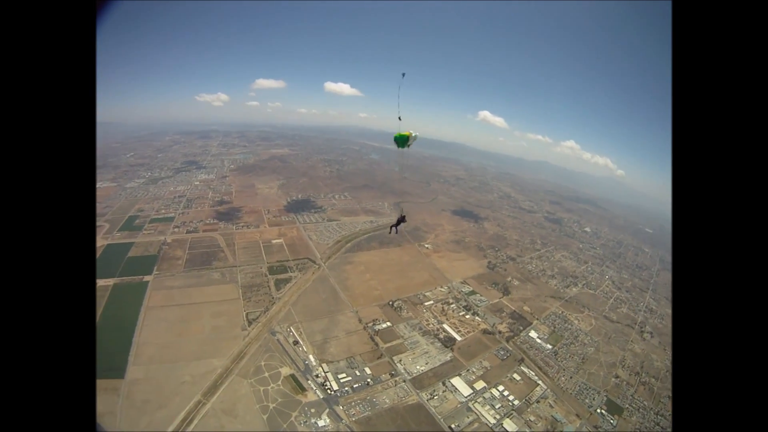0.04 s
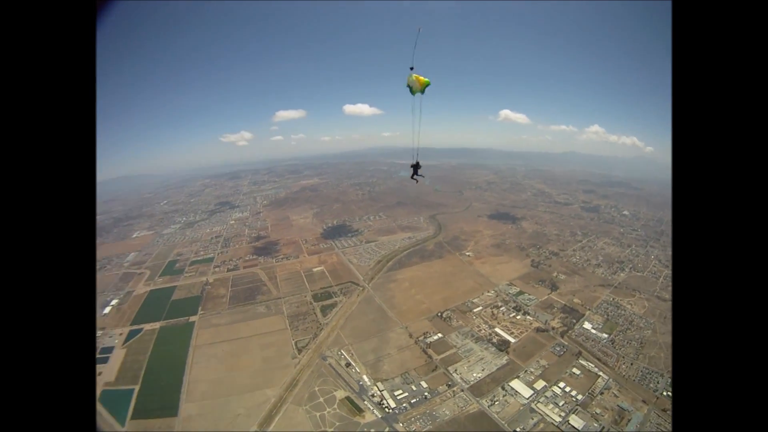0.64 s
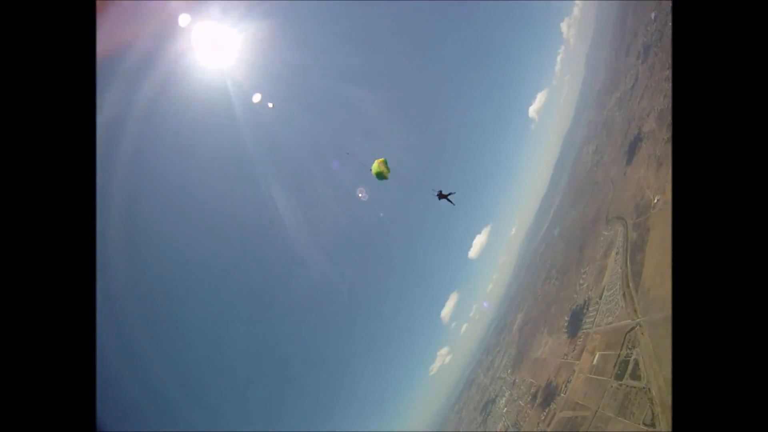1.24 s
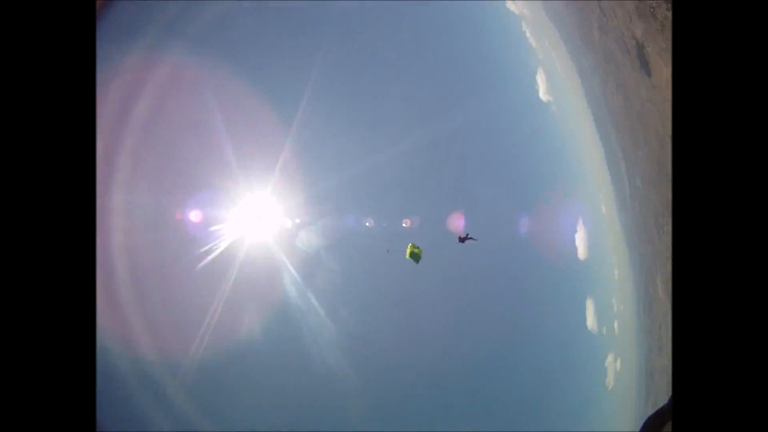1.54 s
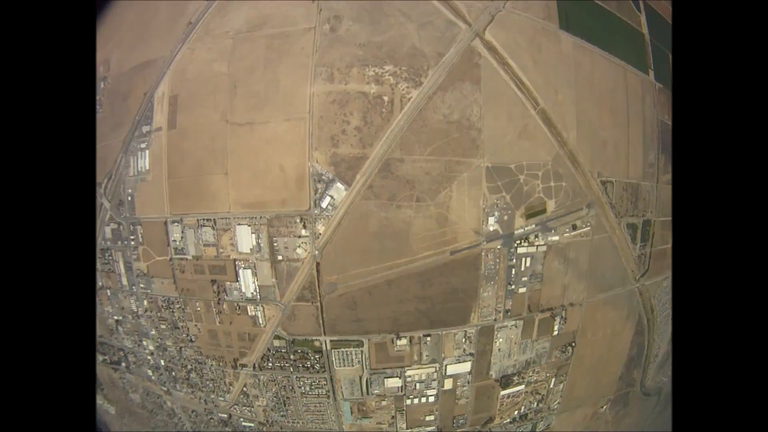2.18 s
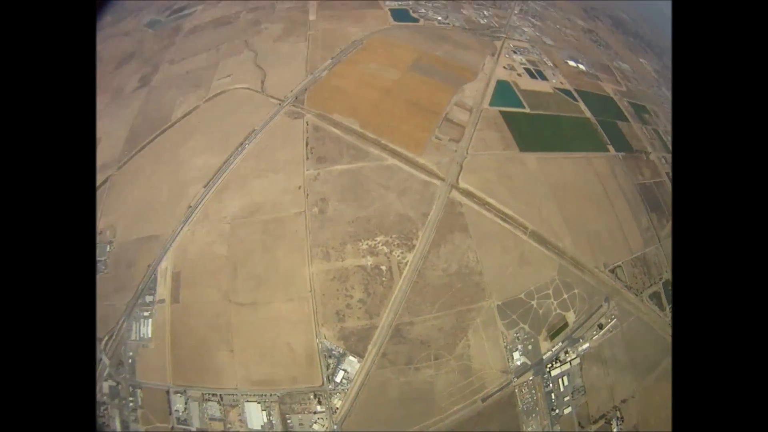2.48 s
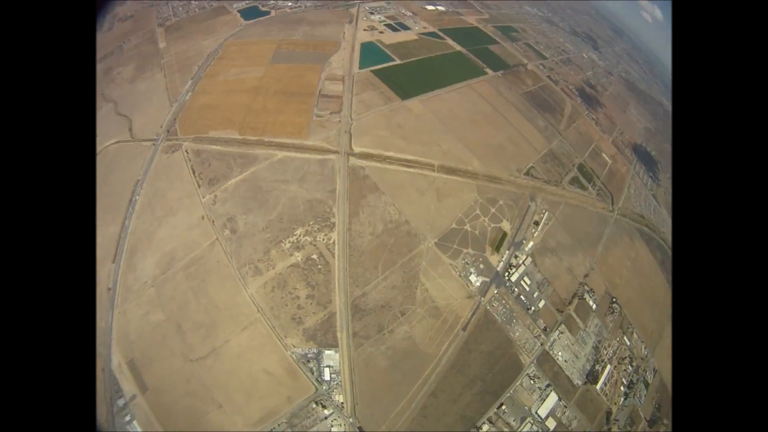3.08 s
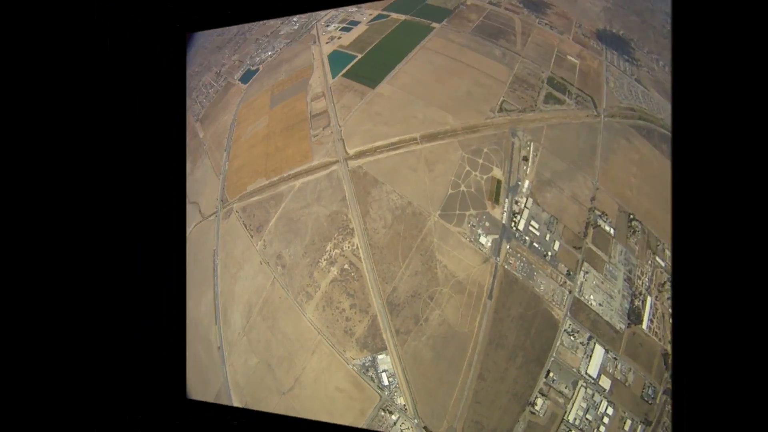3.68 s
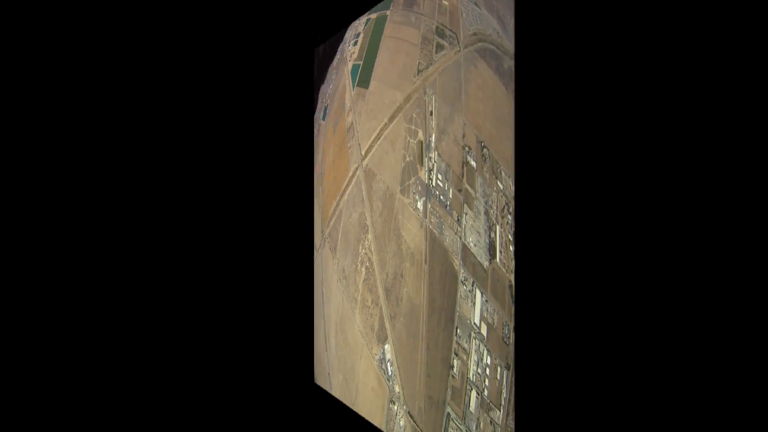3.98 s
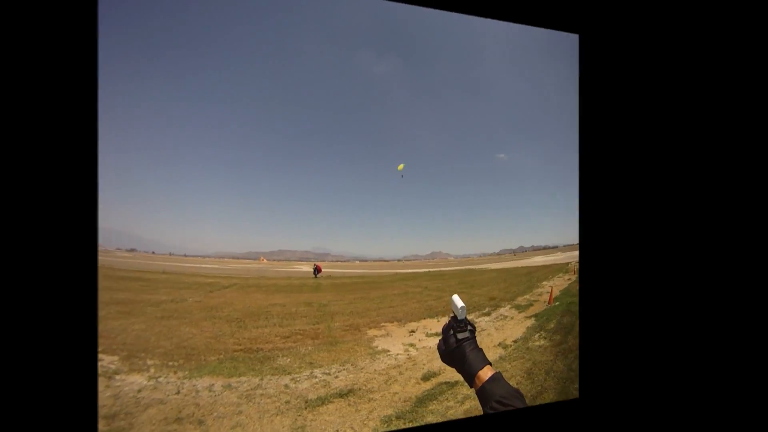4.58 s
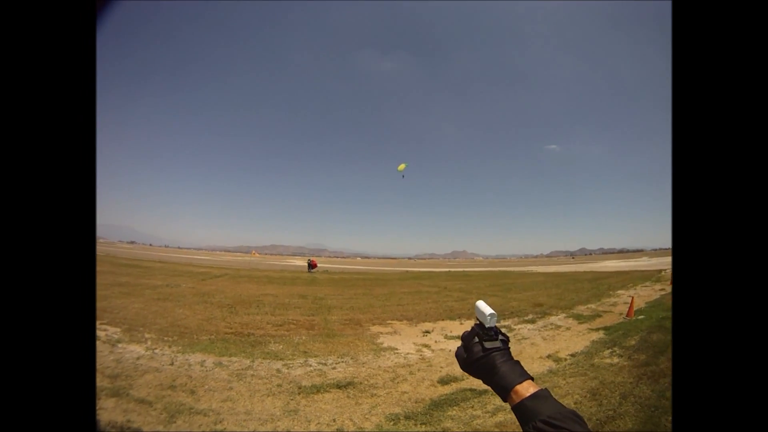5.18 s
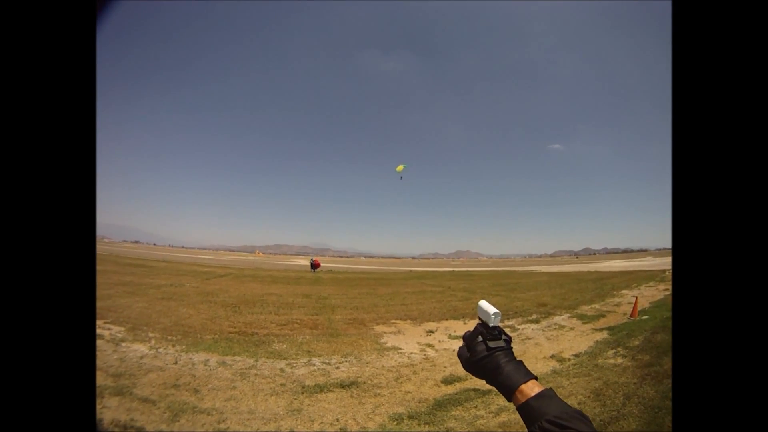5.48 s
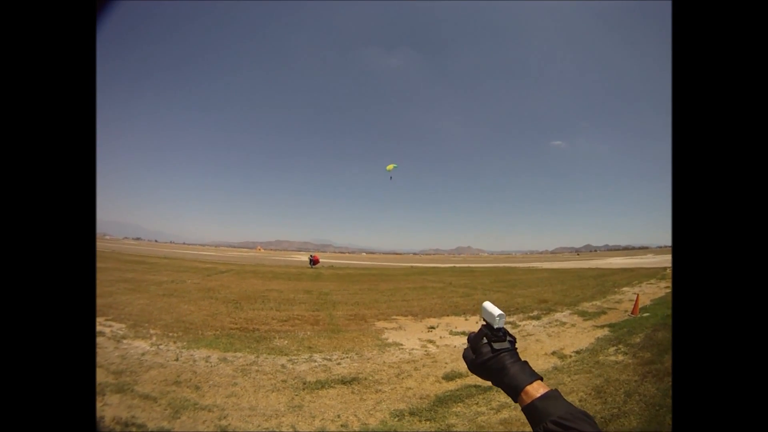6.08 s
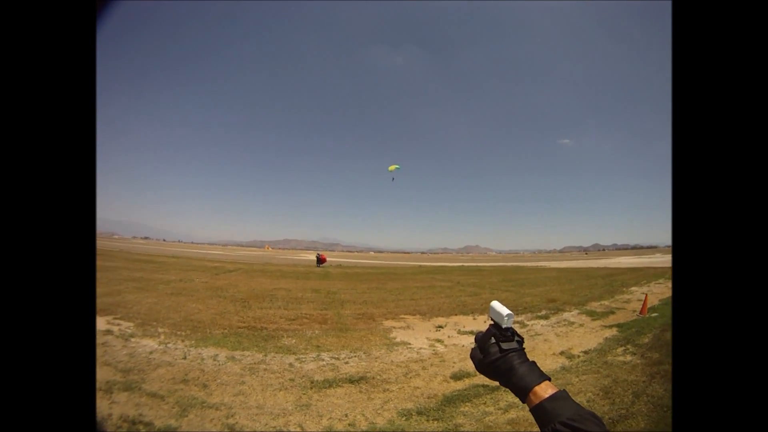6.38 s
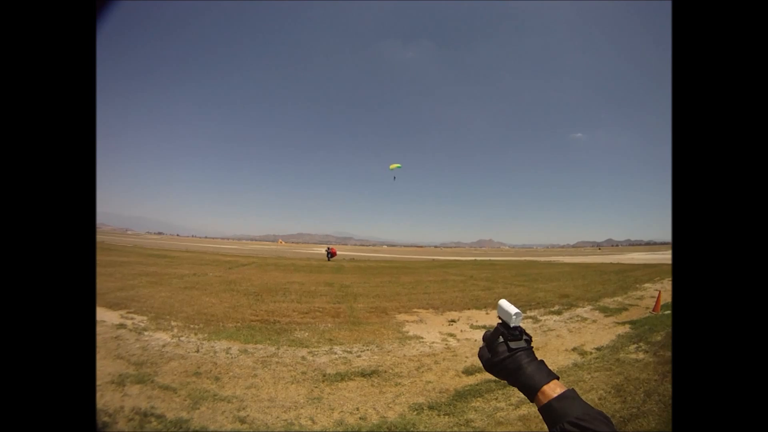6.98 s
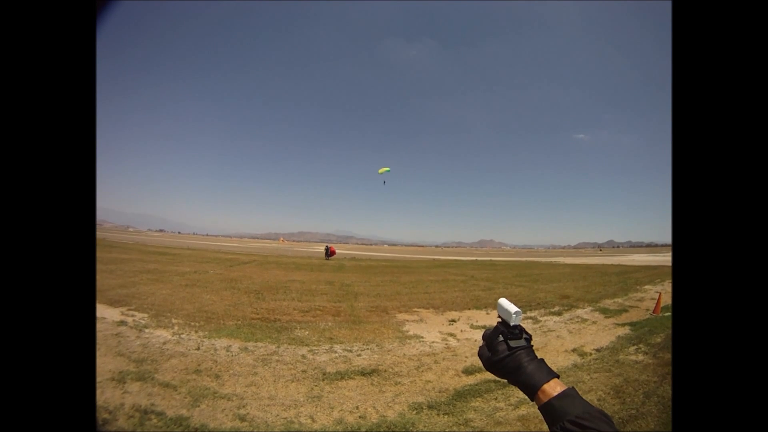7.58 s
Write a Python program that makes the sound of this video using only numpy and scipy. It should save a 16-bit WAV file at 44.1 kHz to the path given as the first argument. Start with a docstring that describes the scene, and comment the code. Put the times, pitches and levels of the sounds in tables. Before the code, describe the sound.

Loud wind batters a helmet microphone during a skydive, with a distorted rumble, hard thuds and ragged, spitting crackle. As the skydiver rolls over, it turns briefly into a brighter rush with two tiny whistles, then the heavy buffeting returns. After about five seconds it cuts abruptly to an open field, where a much quieter breeze bumps the microphone over a faint hiss.

```python
"""In the open sky, at a helmet camera in freefall: shed eddies slam the microphone into soft overload,
air spits at its port, and flow rushes and whistles over the housing as the skydiver rolls over.
The scene cuts to the landing field, where a light breeze bumps the microphone over a faint hiss.
The camera samples slowly and holds each sample, which mirrors the sound into the treble."""
import sys
import numpy as np
from scipy import signal
from scipy.fft import rfft, irfft
from scipy.io import wavfile
from scipy.ndimage import uniform_filter1d

SR = 44100
rng = np.random.default_rng(int(sys.argv[2]) if len(sys.argv) > 2 else 0)


def digitize_waveform(pressure):
    """Quantize a signal to 16-bit integers and store it at the path in sys.argv[1].

    Rows of a 2-D input are taken as channels; values are limited to [-1, 1].
    """
    field = np.atleast_2d(pressure).T
    bounded = np.clip(field, -1, 1)
    quanta = np.round(bounded * 32767).astype(np.int16)
    wavfile.write(sys.argv[1], SR, quanta)


N = 345744
TIME, FREQ = np.arange(N) / SR, np.fft.rfftfreq(N, 1 / SR)

# spectrum of a steep pressure front: frequency_hz, level_db
FRONT_SPECTRUM = [(20, -38), (150, -1), (500, 8), (1000, -5), (1500, -8.5), (2500, -26), (3700, -38),
                  (4300, -40), (6000, -43.5)]


def undb(db):
    """Decibels to amplitude ratio."""
    return 10 ** (np.asarray(db) / 20)


def curves(table):
    """Linear interpolation of each column over the times in the first."""
    times, *columns = np.transpose(table)
    return [np.interp(TIME, times, column) for column in columns]


def colour(x, spectrum):
    """Minimum-phase filter: folding the cepstrum onto positive time makes the response causal."""
    hz, db = np.transpose(spectrum)
    gain = undb(np.interp(np.log(FREQ + 1), np.log(hz), db))
    cepstrum = irfft(np.log(gain), N)
    folded = 2 * cepstrum * (np.arange(N) < N // 2)
    return irfft(rfft(x) * np.exp(rfft(folded) - cepstrum[0]), N)


def steady(x, size=4000):
    """Division by the running rms over size samples; faster flutter stays."""
    power = uniform_filter1d(uniform_filter1d(x ** 2, size), size // 2)
    return x / np.sqrt(np.maximum(power, 1e-18))


def noise(spectrum):
    """Filtered white noise at unit rms."""
    return steady(colour(rng.standard_normal(N), spectrum))


def wander(rate_hz):
    """Low-passed noise: a smooth random drift with unit spread."""
    drift = irfft(rfft(rng.standard_normal(N)) * np.exp(-(FREQ / rate_hz) ** 2), N)
    return drift / drift.std()


def swell(start, length, attack_s, release_s):
    """Trapezoidal envelope from 0 to 1, its ramps centred on the start and the end."""
    return np.clip(.5 + np.minimum((TIME - start) / attack_s, (start + length - TIME) / release_s), 0, 1)


def power_sum_db(base_db, swells, attack_s=.025, release_s=.025):
    """Incoherent addition: a flow and its swells sum in power."""
    power = sum((undb(db) * swell(start, length, attack_s, release_s)) ** 2
                for start, length, db in swells)
    return 10 * np.log10(undb(base_db) ** 2 + power)


def eddies(rate_hz, jitter_db, scatter_db):
    """Vortex shedding at an uneven pace: each eddy pushes or pulls at the microphone port."""
    pace_hz = rate_hz * undb(jitter_db * wander(150))
    arrivals = np.diff(np.floor(np.cumsum(pace_hz) / SR), prepend=0)
    return arrivals * rng.choice([-1, 1], N) * undb(scatter_db * rng.standard_normal(N))


def buffeting_levels(rate_hz):
    """Faster shedding shifts power from rumble to roar; both sink in the lee and return in surges."""
    # surges that reach the microphone as the body turns: start_s, length_s, rumble_db, roar_db
    surges = [(1.264, 0.077, -23, -13), (1.64, 0.088, -17, -16), (1.759, 0.029, -38, -9),
              (1.83, 0.11, -23, -17), (1.975, 0.057, -20, -11.5), (2.087, 0.05, -14, -32),
              (2.146, 0.076, -25, -17)]
    start, length, surge_rumble_db, surge_roar_db = np.transpose(surges)
    doublings = np.log2(rate_hz / 480)  # relative to the cruising eddy rate
    lee = swell(start=1.25, length=.88, attack_s=.025, release_s=.025)
    head_wobble_db = .7 * wander(8.3)
    rumble_db = -16 - doublings - 5.5 * lee
    roar_db = -17.5 + 3.5 * doublings - 5 * lee + head_wobble_db
    return (power_sum_db(rumble_db, zip(start, length, surge_rumble_db)),
            power_sum_db(roar_db, zip(start, length, surge_roar_db)))


def buffeting(pressure, rumble_db, roar_db, split_hz):
    """Eddy size sets frequency: large eddies rumble below the split, small ones roar above it."""
    rumble = irfft(rfft(pressure) / (1 + (FREQ / split_hz) ** 6), N)
    return steady(rumble) * undb(rumble_db) + steady(pressure - rumble) * undb(roar_db)


def pops(impulses, ragged_db, level_db):
    """A steep front has a broad spectrum: some eddies pop, in short flurries."""
    fronts = impulses * undb(ragged_db * rng.standard_normal(N) + 4.2 * wander(12))
    return steady(colour(fronts, FRONT_SPECTRUM), size=12000) * undb(level_db)


def slaps(swing_s, churn_delay_s, churn_s, crack_s):
    """Each slap is a pressure doublet with churning air; returns the thuds and the cracks' envelope."""
    # hard slaps of air, at relative strengths: start_s, thud_db, crack_db
    strikes = [(0.056, -18, -24), (0.121, -19.5, -36), (0.189, -24, -35), (0.228, -17.5, -30),
               (0.28, -18, -37), (0.319, -12, -38), (0.373, -17, -42), (0.424, -12, -24), (0.547, -20, -47),
               (0.591, -32, -29), (0.654, -13.5, -31), (0.711, -20, -41), (0.74, -14, -36),
               (0.81, -14, -46), (0.886, -19, -40), (1.206, -14, -26), (1.232, -7, -21), (1.259, -9, -32),
               (2.881, -13, -43), (4.502, -25, -37)]
    start, thud_db, crack_db = np.transpose(strikes)
    onsets = (start * SR).astype(int)
    kicks = np.bincount(onsets, undb(thud_db), N)
    cracks = np.bincount(onsets, undb(crack_db), N)
    doublets = np.interp(TIME - swing_s, TIME, kicks) - kicks
    age = TIME[:SR // 20]
    churn = signal.fftconvolve(kicks, np.exp(-np.abs(age - churn_delay_s) / churn_s))[:N]
    crack_envelope = signal.fftconvolve(cracks, age / crack_s * np.exp(1 - age / crack_s))[:N]
    thuds = undb(28) * colour(doublets, FRONT_SPECTRUM) + churn * noise(FRONT_SPECTRUM)
    return thuds, crack_envelope


def spitting(blows, crack_envelope, ragged_db, stall_db):
    """Amplitude-modulated noise: air tears at the port most where the pressure changes fastest."""
    # spectrum of the spitting air: frequency_hz, level_db
    spectrum = [(300, -17.5), (900, 7), (1300, 2.5), (1700, 0), (2300, 2.5), (2800, 1.5), (3350, -5),
                (3750, -2.5), (4200, -11.5), (5100, -12), (6000, -24.5)]
    # base level of the spitting: time_s, level_db
    levels = [(0, -43), (.68, -39.5), (.95, -44), (1.13, -37.5), (2.04, -33.5), (2.2, -32), (2.45, -28.5),
              (2.5, -38), (2.8, -34), (3.2, -36.5), (3.6, -31), (3.75, -34), (4.5, -35), (4.72, -31),
              (5.0, -38.5)]
    flurries_db = .3 * ragged_db * wander(10.7)
    level_db = curves(levels)[0] + flurries_db + stall_db
    pressure_slope = np.abs(np.gradient(overload(blows)))
    shear = steady(uniform_filter1d(pressure_slope, size=40))
    tearing = steady((3.8 + shear) * undb(.5 * ragged_db * wander(680)))
    return noise(spectrum) * (tearing * undb(level_db) + crack_envelope)


def overload(pressure, ceiling=.62):
    """Saturation: the microphone runs out of travel and rounds off the strongest pushes and pulls."""
    return ceiling * np.tanh(pressure / ceiling)


def stalls(edge_s=.016):
    """The flow stalls as the roll begins and ends; returns the dB changes of rumble, roar and spit."""
    # level changes in a stall: start_s, length_s, rumble_db, roar_db, spit_db
    changes = [(1.165, 0.057, 1.5, -3, -10), (2.015, 0.06, -2, -10, -6)]
    return sum(np.outer(change_db, swell(start, length, edge_s, edge_s))
               for start, length, *change_db in changes)


def rush(choke_db):
    """Broadband flow noise: air sweeps over the housing during the roll."""
    # spectrum of the rushing air: frequency_hz, level_db
    spectrum = [(300, 1.5), (800, -4.5), (1150, -1), (1600, -2), (2100, 1.5), (2300, -1), (2550, 0.5),
                (3000, -2.5), (3350, -6), (3750, -1), (4000, -4.5), (4300, -13.5), (5150, -12), (6000, -23)]
    # base level of the rush through the roll: time_s, level_db
    levels = [(1.245, -67), (1.262, -23), (1.42, -17), (1.52, -20), (1.81, -18.5), (1.89, -12),
              (1.96, -17.5), (2.005, -22), (2.04, -65)]
    return noise(spectrum) * undb(curves(levels)[0] + choke_db + 1.05 * wander(100))


def whistles(waver):
    """Edge tones: air catches the housing and sings; returns the sound and the rush's dip in dB."""
    # edge tones of the housing: pitch_hz, level_db
    partials = [(2040, 3), (2702, -2), (3908, -7)]
    # moments when the edge sings: start_s, length_s, level_db, pitch_ratio, rush_change_db
    catches = [(1.683, .028, -29, 1, -12), (1.972, 0.039, -32.5, 1.06, -3)]
    wavering_time = np.cumsum(1 + waver * wander(81)) / SR
    singing, choke_db = 0, 0
    for start, length, level_db, pitch_ratio, rush_change_db in catches:
        envelope = swell(start, length, attack_s=.012, release_s=.012)
        tone = sum(undb(db) * np.sin(2 * np.pi * hz * pitch_ratio * wavering_time) for hz, db in partials)
        singing += undb(level_db) * envelope * tone
        choke_db += rush_change_db * envelope
    return singing, choke_db


def freefall():
    """Turbulent pressure and the rush saturate the microphone; spitting and whistles add on top."""
    # airflow at the microphone: time_s, eddy_rate_hz, raggedness_db
    flow = [(0, 318, 6.5), (.72, 341, 10), (.95, 198, 8), (1.2, 172, 10), (1.35, 662, 1), (2.0, 690, 3.5),
            (2.28, 292, 2), (2.45, 566, 8), (2.8, 680, 5), (3.0, 600, 5.5), (3.15, 430, 4), (3.55, 640, 4),
            (5.0, 540, 4.5)]
    # pressure spectrum of an eddy: frequency_hz, level_db
    eddy_spectrum = [(15, -13), (35, -5.5), (65, 3), (120, 2.5), (200, 0.5), (300, -3), (460, -4.5),
                     (580, -9.5), (750, -16.5), (1050, -25), (1500, -41), (5000, -86)]
    rate_hz, ragged_db = curves(flow)
    rumble_db, roar_db = buffeting_levels(rate_hz)
    rumble_stall_db, roar_stall_db, spit_stall_db = stalls()
    rumble_db += rumble_stall_db
    roar_db += roar_stall_db
    impulses = eddies(rate_hz, jitter_db=4, scatter_db=4)
    buffet = buffeting(colour(impulses, eddy_spectrum), rumble_db, roar_db, split_hz=226)
    popping = pops(impulses, ragged_db, level_db=roar_db - 11.5)
    thuds, crack_envelope = slaps(swing_s=.00134, churn_delay_s=.0032, churn_s=.0025, crack_s=.0017)
    blows = buffet + popping + thuds
    spit = spitting(blows, crack_envelope, ragged_db, spit_stall_db)
    singing, choke_db = whistles(waver=.0136)
    return overload(blows + rush(choke_db)) + spit + singing


def breeze():
    """Weak turbulence bumps the microphone; the stronger the gust, the more it roars."""
    # pressure spectrum of the breeze: frequency_hz, level_db
    spectrum = [(15, -14), (35, -3.5), (70, -0.5), (110, -1), (150, 1), (205, -7.5), (270, -9.5),
                (380, -11), (490, -11), (630, -18.5), (850, -40.5), (1500, -62)]
    # light air between gusts: time_s, rumble_db
    light_air = [(5.0, -36), (6.8, -33.5), (7.5, -43), (7.84, -35.5)]
    # gusts on the field: start_s, length_s, rumble_db
    gusts = [(4.98, 0.11, -30.5), (5.137, .07, -30.5), (5.29, 0.22, -33), (5.565, .17, -25),
             (5.76, 0.037, -26.5), (6.0, 0.08, -30), (6.14, 0.17, -26.5), (6.457, 0.18, -27.5),
             (6.667, .06, -29), (6.796, 0.092, -33), (6.937, 0.093, -29.5), (7.09, 0.2, -32),
             (7.69, .07, -31.5)]
    rumble_db = power_sum_db(curves(light_air)[0], gusts, attack_s=.035, release_s=.071)
    roar_db = -42.5 + .52 * (rumble_db + 30)
    pressure = colour(rng.standard_normal(N) * undb(2.3 * wander(8.7)), spectrum)
    return buffeting(pressure, rumble_db, roar_db, split_hz=230)


def hiss():
    """Broadband background noise on the field, slowly rising and falling."""
    # spectrum of the hiss: frequency_hz, level_db
    spectrum = [(150, 0.5), (700, 2), (1100, -3), (2000, -1.5), (2400, 2), (3200, -1), (3750, -16),
                (4700, -17.5), (6000, -26)]
    # course of the hiss: time_s, level_db
    levels = [(5.0, -55.5), (5.45, -53), (5.72, -50.5), (5.95, -50), (6.25, -53), (6.95, -52.5),
              (7.4, -52.5), (7.65, -54.5)]
    return noise(spectrum) * undb(curves(levels)[0])


def scene():
    """Freefall, then a 3 ms crossfade to the landing field, heard as a cut."""
    cut_s = 5.001
    landed = np.interp(TIME, [cut_s - .002, cut_s + .001], [0, 1])
    return (freefall() * (1 - landed) + (breeze() + hiss()) * landed)[None]


def record(dry):
    """Sample and hold: the band below half the hold rate leaves weaker images either side of that rate."""
    hold_hz, top_hz = 12000, 15350
    band = signal.sosfilt(signal.ellip(10, .1, 70, hold_hz / 2, fs=SR, output="sos"), dry)
    sampled = band * (1 + 2 * np.cos(2 * np.pi * hold_hz * TIME))
    held = irfft(rfft(sampled) * np.sinc(FREQ / hold_hz), N)
    return signal.sosfilt(signal.ellip(12, .1, 80, top_hz, fs=SR, output="sos"), held)


dry = scene()
out = record(dry)
digitize_waveform(out)
```